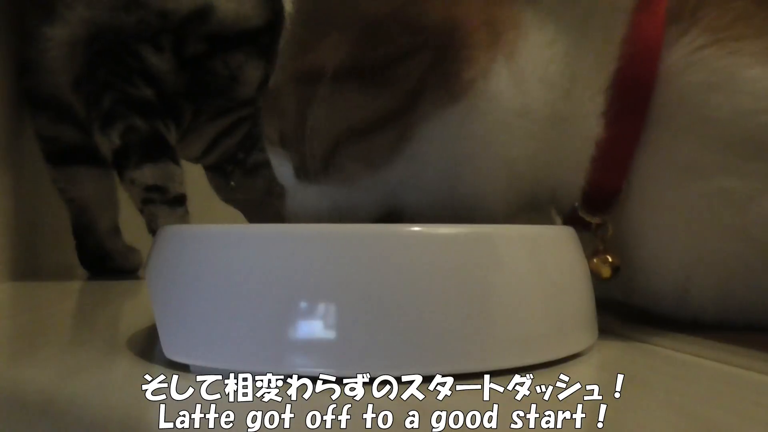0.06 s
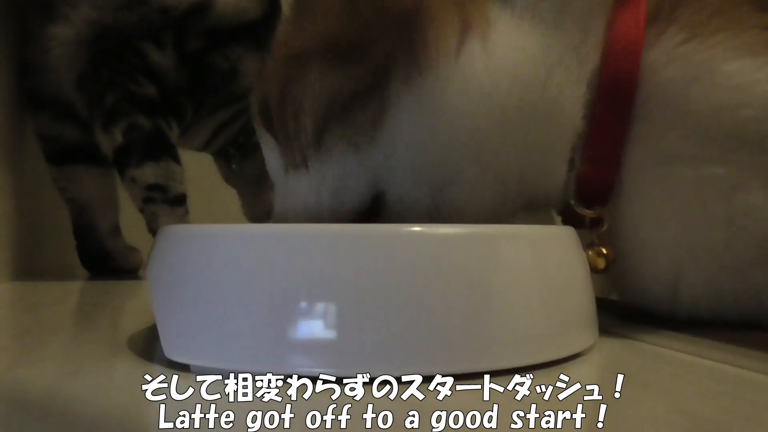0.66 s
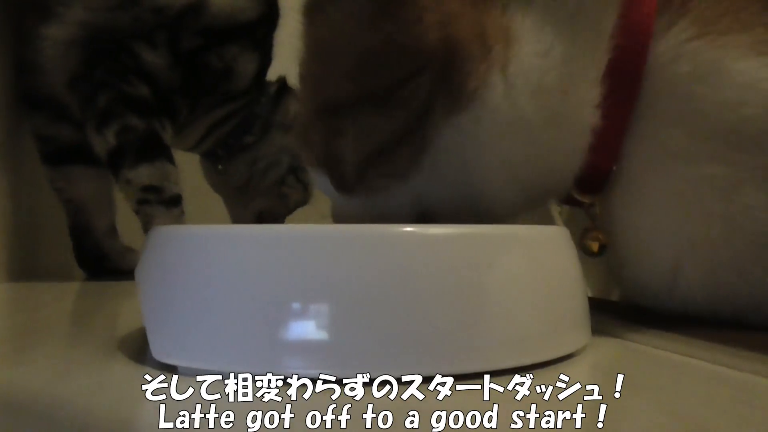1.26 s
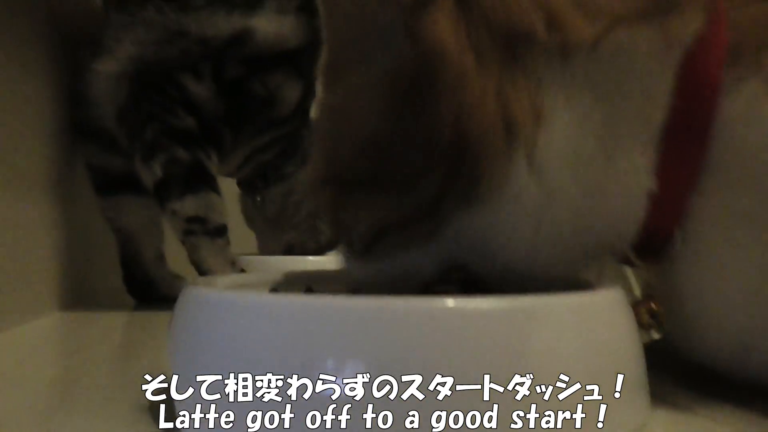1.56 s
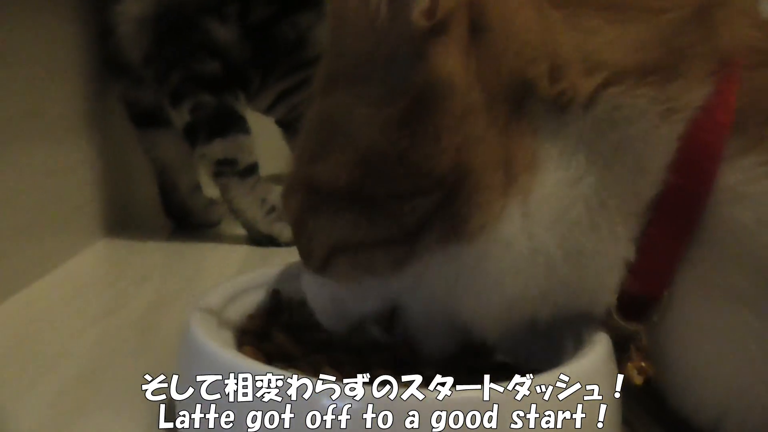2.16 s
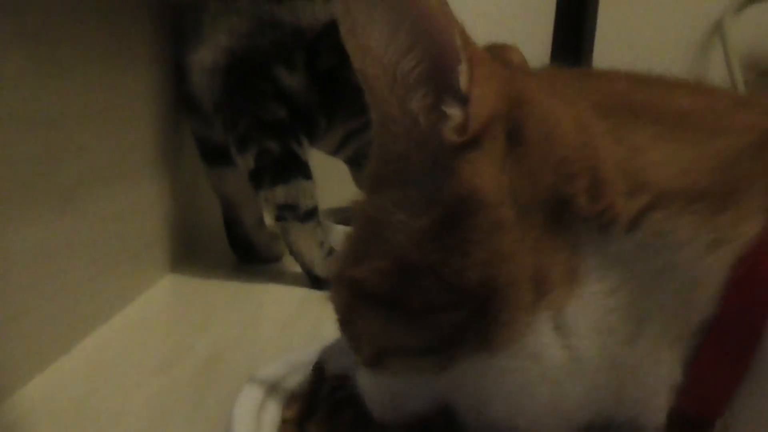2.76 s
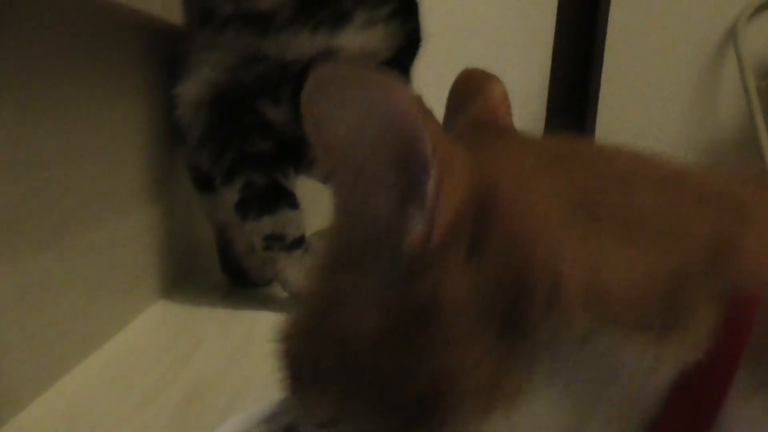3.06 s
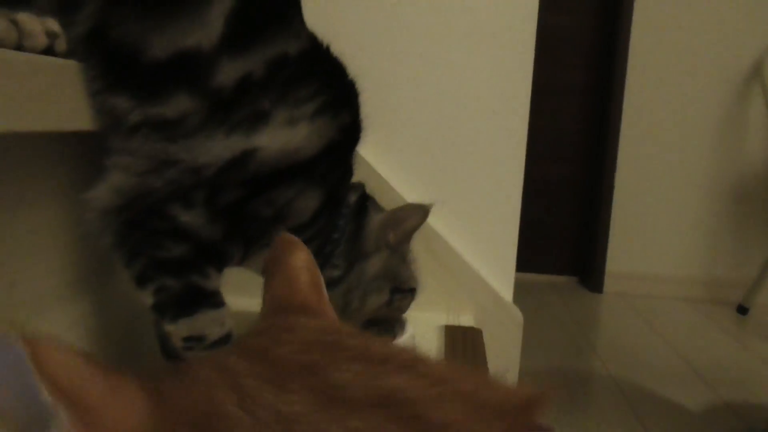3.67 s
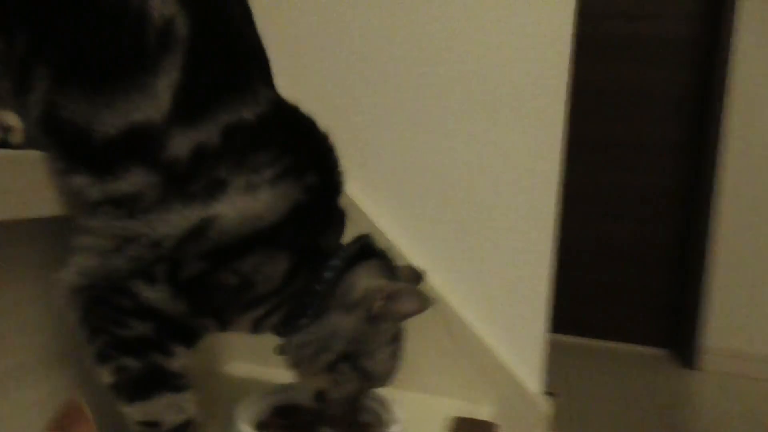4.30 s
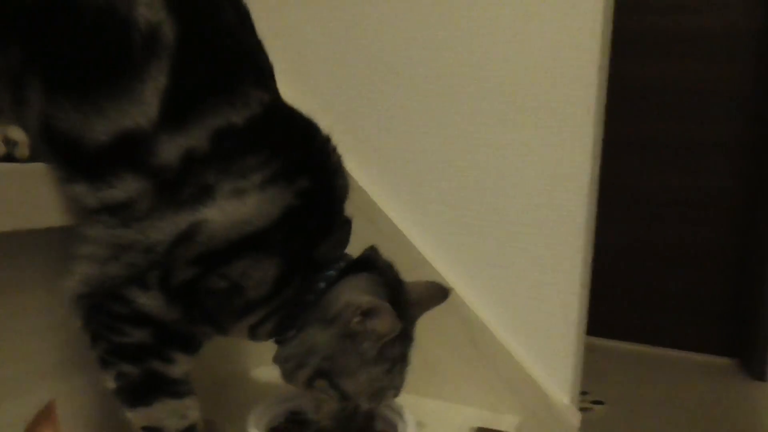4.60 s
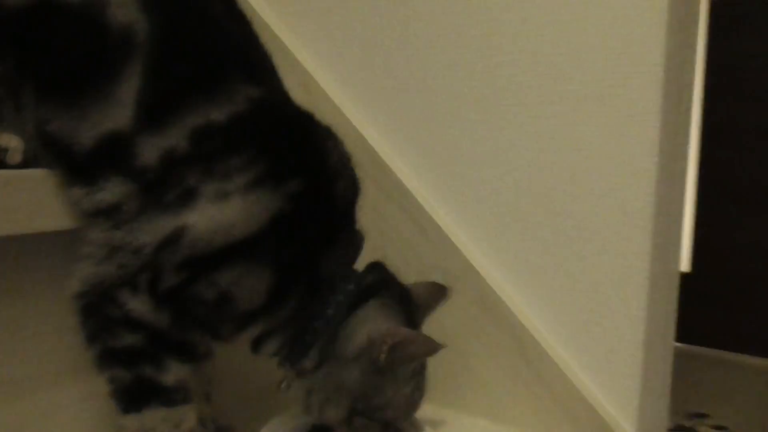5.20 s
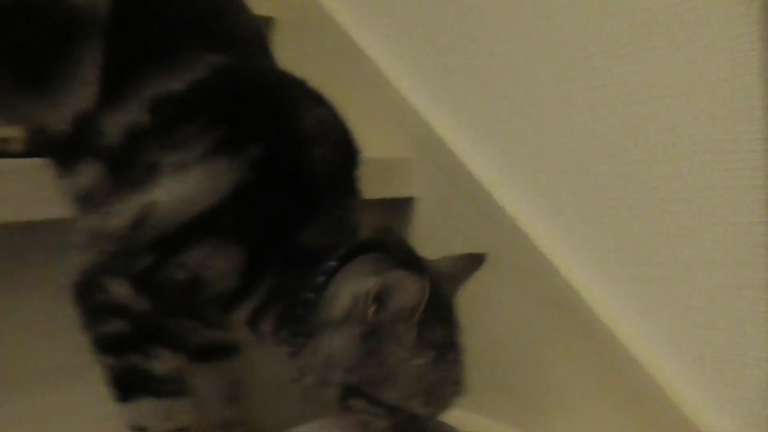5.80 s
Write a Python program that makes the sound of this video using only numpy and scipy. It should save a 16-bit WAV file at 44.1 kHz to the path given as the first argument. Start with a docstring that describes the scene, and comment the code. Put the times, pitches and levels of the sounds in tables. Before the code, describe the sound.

Close by, a cat pushes dry food around a ceramic bowl, making small, high clinks and rattles while it chews, smacks and cracks single pieces. Soft bumps and low rubs sound near the microphone early on. Past the middle, a second cat's bowl takes over, farther away and slightly left, and the clicks thin out. The indoor space is quiet, with a low, even hush and very little echo.

```python
"""Dry kibble rattles and clinks in ceramic bowls as two cats eat in a quiet stairwell, one close, one farther.
Muzzles stir the food in bouts, and each collision excites the resonant modes of a bowl.
In between, jaws chew and smack, ringing the cavity of the mouth, and teeth crack single pieces.
A few dull bumps, short low rubs and brushes of fur sound close by, over a steady hush."""
import sys
import numpy as np
from scipy import signal
from scipy.fft import rfft, irfft
from scipy.io import wavfile
from scipy.ndimage import uniform_filter1d, map_coordinates

SR = 44100
rng = np.random.default_rng(int(sys.argv[2]) if len(sys.argv) > 2 else 0)


def to_wav(s):
    """Save 16-bit WAV."""
    ch = np.atleast_2d(s).T  # columns
    pcm = np.round(np.clip(ch, -1, 1) * 32767)  # PCM
    wavfile.write(sys.argv[1], SR, pcm.astype(np.int16))


N = 266805


def from_db(db):
    """Amplitude ratio of a level in decibels."""
    return 10 ** (np.asarray(db) / 20)


def rms_one(x):
    """Normalisation to unit rms."""
    return x / np.sqrt(np.mean(x ** 2) + 1e-20)


def at_level(sound, db, size):
    """Normalisation of a transient by the rms of its first samples."""
    return sound * from_db(db) / np.sqrt(np.mean(sound[:, :size] ** 2))


def in_time(rows):
    """Linear interpolation of (time_s, value) rows at every sample."""
    return np.interp(np.arange(N) / SR, *np.transpose(rows))


def swells(rows):
    """Amplitude envelope: one elliptical arch for each (start_s, length_s, level_db)."""
    t = np.arange(N) / SR
    return sum(from_db(db) * np.sqrt(np.maximum(1 - (2 * (t - s) / length - 1) ** 2, 0))
               for s, length, db in rows)


def panned(x, left_db):
    """Level difference between channels: positive values move the sound left."""
    return np.array([x[0] * from_db(left_db / 2), x[1] * from_db(-left_db / 2)])


def two_mics(force, spread):
    """Partial decorrelation: each impulse reaches the two microphones with unequal strength."""
    return force * (1 + spread * rng.standard_normal(len(force)) * np.array([[1], [-1]]))


def add(out, sound, start_s):
    """Superposition of a sound onto the mix."""
    i = max(0, round(start_s * SR))
    out[:, i:i + sound.shape[1]] += sound[:, :N - i]


def rolloff(x, order, hz, kind="low"):
    """Maximally flat low-pass or high-pass filter."""
    return signal.sosfilt(signal.butter(order, hz, kind, fs=SR, output="sos"), x)


def resonance(x, hz, width_hz):
    """Damped oscillator: two poles, unit gain at the peak."""
    r = np.exp(-np.pi * width_hz / SR)
    feedback = [1, -2 * r * np.cos(2 * np.pi * hz / SR), r * r]
    return signal.lfilter(np.array([1, 0, -1]) * (1 - r * r) / 2, feedback, x + 1e-18)


def coloured(x, spectrum, size=4096):
    """Minimum-phase filter that follows (frequency_hz, gain_db) rows."""
    hz, db = np.transpose(spectrum)
    f = np.maximum(np.arange(size // 2 + 1) * SR / size, 1)
    below_db = 20 * np.log10(np.minimum(f / hz[0], 1))
    cepstrum = irfft(np.log(from_db(np.interp(np.log(f), np.log(hz), db) + below_db)))
    cepstrum[1:size // 2] *= 2   # folding the cepstrum makes the response causal
    cepstrum[size // 2 + 1:] = 0
    response = irfft(np.exp(rfft(cepstrum)))
    return signal.fftconvolve(x, response[None], axes=1)[:, :x.shape[1]]


def grains(per_s, size_db, spread, grain_s):
    """Shot noise: random collisions of uneven size, each decaying exponentially; unit rms."""
    onsets = rng.random(N) < per_s / SR
    power = onsets * from_db(size_db * np.minimum(rng.exponential(1, N), 3)) ** 2
    power = signal.lfilter([1], [1, -np.exp(-2 / (grain_s * SR))], power + 1e-12)
    power = power / (uniform_filter1d(power, size=1300) + .1 * power.mean())   # evens out slow swings
    return rms_one(two_mics(np.sqrt(power) * rng.standard_normal(N), spread))


def contact(chatter_s, spread, size=3000):
    """Impact force: a chatter of tiny rebounds that stops abruptly, then a faint slide."""
    t = np.arange(size) / SR
    envelope = np.exp(-(t / chatter_s) ** 3) + from_db(-25) * np.exp(-t / .006)
    attack = 1 - np.exp(-t / .0001)
    return two_mics(rng.standard_normal(size) * envelope * attack, spread)


# spectrum of the indoor hush: frequency_hz, gain_db
HUSH_SPECTRUM = [(25, -14), (45, -23), (100, -2.5), (160, -1), (330, -9.5), (620, -17.5), (1050, -10.5),
                 (1400, -9), (1800, -29), (4900, -30), (6200, -21), (10000, -22), (16000, -27)]

def room_tone():
    """Stationary noise, strongest in the bass, gives a steady hush."""
    noise = two_mics(rng.standard_normal(N), spread=.49)
    return from_db(-57) * rms_one(coloured(noise, HUSH_SPECTRUM))


def stairwell(x, t60_s, wet_db):
    """Reverberation: a diffuse exponential tail, different on each side, follows the direct sound."""
    t = np.arange(N // 14) / SR
    tail = rng.standard_normal((2, len(t))) * from_db(-60 * t / t60_s) * (t > .004)
    tail = tail / np.sqrt(np.sum(tail ** 2) / 2)
    return x + from_db(wet_db) * signal.fftconvolve(x, tail, axes=1)[:, :N]


# spectrum of brushing fur: frequency_hz, gain_db
FUR_SPECTRUM = [(1500, -1), (4000, 2.5), (6200, -3), (9000, -1), (15000, -7.5)]
# fur brushes past: start_s, length_s, level_db
FUR_STROKES = [(1.02, 0.07, -50.5), (1.175, 0.13, -42.5), (5.96, 0.11, -51)]

def brushing():
    """Friction noise: fur gives a smooth hiss that swells with each stroke."""
    noise = two_mics(rng.standard_normal(N), spread=.7)
    return rms_one(coloured(noise, FUR_SPECTRUM)) * swells(FUR_STROKES)


# something soft rubs close by: start_s, length_s, relative_level_db, pitch_hz, fall_octaves_per_s
SOFT_RUBS = [(0.044, 0.13, -46, 373.3, 0.35), (0.322, .16, -40.5, 440, 4), (0.479, .13, -43, 165.4, 5.53),
             (1.338, 0.24, -41, 266.5, 0.52), (2.599, .15, -43, 299.8, 0.44),
             (3.292, .17, -53.5, 305, 0.26)]

def rubbing(slip_hz=95, fade_db=4.5):
    """Amplitude modulation: uneven slips roughen a low tone that sinks and fades as the stroke slows."""
    out = np.zeros((2, N))
    for s, length, db, hz, fall in SOFT_RUBS:
        t = np.arange(0, length, 1 / SR)
        noise = two_mics(rng.standard_normal(N // 2), spread=.12)
        slips = rms_one(rolloff(noise, 2, slip_hz)[:, -len(t):])
        tone = np.sin(2 * np.pi * np.cumsum(hz * 2 ** (-fall * t)) / SR)
        envelope = from_db(db + 3 - fade_db * t / length) * signal.windows.tukey(len(t), .08)
        add(out, slips * tone * envelope, s)
    return rolloff(out, 4, 75, "high")


# soft blows: start_s, level_db, pitch_hz
DULL_BUMPS = [(0.048, -32.5, 367), (0.326, -35.5, 368), (0.412, -40, 236), (0.495, -42, 137),
              (0.9276, -34, 318), (1.338, -29.5, 160), (1.345, -31.5, 224), (1.367, -30, 357),
              (1.434, -33, 193), (1.525, -29, 383), (1.526, -33.5, 765), (2.595, -33, 282)]

def bumps():
    """Heavy damping: a soft blow dies within a few cycles and has little deep bass."""
    out, t = np.zeros((2, N)), np.arange(N // 40) / SR
    for s, db, hz in DULL_BUMPS:
        thud = np.sin(2 * np.pi * hz * t) * np.exp(-t * hz) * (1 - np.exp(-t / .00086))
        add(out, at_level(np.array([thud, thud]), db, size=530), s)
    return rolloff(out, 4, 85, "high")


# spectrum of mouth sounds: frequency_hz, gain_db
MOUTH_SPECTRUM = [(150, -11.5), (400, 0), (630, -13), (850, -5), (1050, -8), (1370, -5), (1680, -14),
                  (2050, -10.5), (3000, -15.5), (4800, -11.5), (8000, -45), (16000, -120)]
# strokes of jaw or tongue: peak_s, length_s, relative_level_db, resonance_hz
JAW_STROKES = [(0.229, 0.14, -47.5, 2140), (0.508, 0.12, -46, 1280), (0.652, 0.12, -45, 1780),
               (0.811, 0.067, -40.5, 1580), (0.909, 0.15, -42.5, 1260), (1.06, 0.15, -44, 1710),
               (1.284, 0.34, -47, 1410), (1.456, 0.24, -47.5, 1340), (1.598, 0.15, -44.5, 2000),
               (1.813, 0.27, -51.5, 1180), (1.991, 0.13, -42, 1880), (2.214, 0.29, -48.5, 1220),
               (2.439, 0.1, -46, 1610), (2.684, 0.48, -47, 1300), (2.943, 0.12, -46.5, 1550),
               (3.165, 0.1, -48, 1770), (3.288, 0.14, -48.5, 1190), (3.491, 0.1, -42.5, 1460),
               (3.75, 0.11, -44.5, 1350), (3.898, 0.11, -46, 1330), (4.125, 0.15, -43.5, 1330),
               (4.284, 0.18, -48, 1070), (4.544, 0.23, -50, 1210), (4.696, 0.15, -44.5, 1040),
               (4.858, 0.39, -49, 1220), (5.139, 0.15, -50, 1360), (5.365, 0.26, -49.5, 1350),
               (5.63, 0.31, -56.5, 1450)]
# direction of the chewing: time_s, left_over_right_db
CHEWING_PAN = [(3.3, -0.5), (4.2, 4), (5.4, 3), (5.9, 2)]

def chewing(edge_db=23):
    """Cavity resonance: the mouth filters wet crackle in strokes that fall edge_db below the peak halfway to
    their ends."""
    crackle = grains(per_s=300, size_db=3.5, spread=.3, grain_s=.004)
    crackle = rms_one(coloured(crackle, MOUTH_SPECTRUM))
    t = np.arange(N) / SR
    out = crackle * from_db(-50 - 1.7 * t)   # faint licking, slowly fading
    for s, length, db, hz in JAW_STROKES:
        span = np.abs(t - s) < length
        hollow = resonance(crackle[:, span], hz, width_hz=500) + from_db(-11) * crackle[:, span]
        swell_db = db - edge_db * (2 * (t[span] - s) / length) ** 2
        out[:, span] += rms_one(hollow) * from_db(swell_db)
    return panned(from_db(-2.5) * out, in_time(CHEWING_PAN))


# spectrum of a dry click of kibble or teeth: frequency_hz, gain_db
CLICK_SPECTRUM = [(200, -7), (700, -19.5), (1200, 9.5), (2100, -26.5), (3000, 5), (4200, -1.5), (7000, -8),
                  (10000, -4.5), (12000, -18), (14000, -17), (16500, -8)]
# lips and teeth snap shut: start_s, level_db, pitch_hz, left_over_right_db
JAW_SNAPS = [(0.047, -31, 1380, 3.5), (0.239, -37, 2280, -3), (0.672, -45, 1880, -1),
             (0.802, -43.5, 1200, 2), (0.854, -40, 3300, 0), (0.929, -32, 1010, 1.5), (1.067, -38, 3030, 0),
             (1.16, -43.5, 3560, -3), (1.3669, -22, 1220, 1), (1.402, -33, 900, 4),
             (1.467, -37.5, 1840, -1), (1.624, -37, 2280, 2), (3.058, -36.5, 1180, -2),
             (4.716, -43, 1000, 8), (5.549, -42.5, 1340, -1), (5.678, -44.5, 1280, 3), (5.977, -43, 785, 1)]

def smacks():
    """Impulse excitation: a snap of the jaw rings the mouth, with a sharp edge from the teeth."""
    out = np.zeros((2, N))
    for s, db, hz, left_db in JAW_SNAPS:
        force = contact(chatter_s=.0055, spread=.3)
        cavity = resonance(coloured(force, MOUTH_SPECTRUM), hz, width_hz=590)
        teeth = from_db(-22.5) * coloured(force, CLICK_SPECTRUM)
        add(out, panned(at_level(cavity + teeth, db, size=350), left_db), s)
    return out


# teeth break a piece: start_s, level_db
FRACTURES = [(0.047, -34.5), (0.1685, -39.5), (0.9287, -43.5), (1.366, -29.5), (1.6097, -34), (2.6883, -25),
             (2.9845, -32), (3.0164, -39), (3.034, -27), (3.33, -47), (3.631, -36), (5.5752, -40),
             (5.588, -44)]

def cracks():
    """Brittle fracture: a piece snaps between the teeth in a short, bright burst."""
    out = np.zeros((2, N))
    for s, db in FRACTURES:
        burst = resonance(contact(chatter_s=.0022, spread=.3), hz=11500, width_hz=4000)
        add(out, at_level(rolloff(burst, 6, 14000), db, size=220), s)
    return out


# modes of the filled bowls: frequency_hz, width_hz, near_bowl_db, far_bowl_db
BOWL_MODES = [(1350, 160, -19, -16), (2905, 75, -7, -7), (3490, 70, -7.5, -17), (4660, 190, -10, -11),
              (4880, 120, -11, 6), (5480, 100, -11, -16), (6110, 140, -18, -17), (6800, 220, -13, -16),
              (7150, 220, -7, -4), (7740, 160, -8, -8), (8090, 160, -11, -10), (9145, 110, -9, -11),
              (9780, 190, 2, -3), (10330, 170, -14, -6), (11000, 110, -10, -11), (11480, 170, -13, -12),
              (11900, 220, -13, -16)]

def bowl(force, far, click_db, wander_db):
    """Modal ringing plus the kibble's dry click; each mode's strength wanders with the spot struck."""
    t = np.arange(force.shape[1]) / SR
    spot_times = np.arange(0, t[-1] + .06, .03)
    ring = 0
    for hz, width, near_db, far_db in BOWL_MODES:
        spot_db = wander_db * np.interp(t, spot_times, rng.standard_normal(len(spot_times)))
        mode_db = near_db + far * (far_db - near_db) + spot_db
        ring = ring + from_db(mode_db) * resonance(force, hz, width)
    return ring + from_db(click_db) * coloured(force, CLICK_SPECTRUM)


# kibble is dragged along the glaze: start_s, length_s, level_db
GLAZE_DRAGS = [(0.335, 0.19, -40), (0.725, 0.063, -40)]

def scraping():
    """Stick-slip friction: dragged kibble catches so often that the near bowl keeps ringing."""
    slips = grains(per_s=260, size_db=3, spread=.3, grain_s=.003)
    force = resonance(slips, hz=3300, width_hz=1800) + from_db(-26) * slips
    return rms_one(bowl(force, far=0, click_db=-24, wander_db=3)) * swells(GLAZE_DRAGS)


# a muzzle pushes through the kibble: start_s, length_s, relative_level_db
MUZZLE_PUSHES = [(0.238, 0.045, -46.5), (0.344, 0.17, -36.5), (0.518, 0.046, -41.5), (0.624, 0.018, -48.5),
                 (0.731, 0.035, -43.5), (1.604, 0.026, -39), (1.686, 0.057, -48), (1.777, 0.14, -42.5),
                 (1.968, 0.031, -31.5), (2.098, 0.14, -39), (2.199, 0.029, -30.5), (2.241, 0.051, -41.5),
                 (2.416, 0.054, -40.5), (2.542, 0.16, -35.5), (2.787, 0.17, -45), (2.966, 0.023, -43.5),
                 (3.038, 0.033, -37), (3.101, 0.054, -43), (3.24, 0.036, -45), (3.284, 0.085, -43),
                 (3.47, 0.04, -45.5), (3.582, 0.042, -42.5), (3.68, 0.12, -43.5), (3.908, 0.011, -47),
                 (4.281, 0.057, -46.5), (4.468, 0.14, -43.5), (4.704, 0.034, -47), (4.82, 0.1, -49.5),
                 (4.872, 0.11, -45), (5.246, 0.17, -47), (5.558, 0.042, -50.5)]

def pushing(attack_s=.0098, sag_db_per_s=61, settle_db_per_s=405):
    """Incoherent sum: pushes add in power; each bites in, eases off, then the kibble settles."""
    power = np.zeros((1, N))
    t = np.arange(SR // 2) / SR - attack_s
    for s, length, db in MUZZLE_PUSHES:
        rise = np.clip(1 + t / attack_s, 0, 1)
        fall_db = sag_db_per_s * np.maximum(t, 0) + settle_db_per_s * np.maximum(t - length, 0)
        add(power, (rise * from_db(db - fall_db))[None] ** 2, s - attack_s)
    return np.sqrt(power[0])


# which bowl is heard most: time_s, far_fraction (0 near bowl, 1 far bowl)
BOWL_BLEND = [(0, 0.21), (2.7, 0.2), (3.3, 0.51), (4.0, 0.75)]
# resonances of large to small pieces: pitch_hz
PIECE_PITCHES = [2980, 5580, 7570, 9520]
PIECE_WIDTH_HZ = 3530

def stirring():
    """Random forcing: hundreds of collisions a second under a pushing muzzle keep the bowl ringing."""
    force = 0
    for hz in PIECE_PITCHES:
        hits = grains(per_s=130, size_db=3, spread=.46, grain_s=.002)
        force = force + resonance(hits, hz, PIECE_WIDTH_HZ) + from_db(-23.5) * hits
    rattle = bowl(force * pushing(), in_time(BOWL_BLEND), click_db=-14, wander_db=3.5)
    return from_db(12.5) * rattle


# single pieces hit the bowl: start_s, relative_level_db, pitch_hz, chatter_s
KIBBLE_HITS = [(0.0397, -27.5, 3600, 0.0047), (0.2116, -26, 4800, 0.0011), (0.2251, -27, 9400, 0.0012),
               (0.2391, -23, 5270, 0.0025), (0.39, -22.5, 9400, 0.0058), (0.441, -25, 9700, 0.0035),
               (0.448, -22.5, 7840, 0.0065), (0.462, -16, 9400, 0.0034), (0.4658, -16.5, 8000, 0.0087),
               (0.5366, -25, 7940, 0.0039), (0.678, -22, 9200, 0.002), (0.733, -26, 9500, 0.0071),
               (0.765, -27, 9300, 0.0019), (0.7961, -31.5, 9500, 0.0034), (1.174, -26.5, 8500, 0.001),
               (1.7005, -28, 8750, 0.0022), (1.7779, -19.5, 9000, 0.0046), (1.8105, -20, 8500, 0.0018),
               (1.823, -24, 9400, 0.0065), (1.9446, -25.5, 9800, 0.0022), (1.9704, -20, 9400, 0.0028),
               (1.993, -25, 7800, 0.0032), (2.0062, -22, 9700, 0.002), (2.08, -24, 5500, 0.0038),
               (2.1325, -16.5, 8500, 0.003), (2.4439, -17.5, 9600, 0.0076), (2.4613, -19, 9400, 0.014),
               (2.542, -28, 8800, 0.006), (2.5633, -21.5, 10200, 0.0093), (2.647, -25, 10800, 0.025),
               (2.6895, -15, 8100, 0.0034), (2.781, -31, 7700, 0.0026), (2.8554, -26.5, 7140, 0.011),
               (2.998, -22, 11100, 0.005), (3.037, -20.5, 8400, 0.0049), (3.142, -24, 6200, 0.0036),
               (3.1492, -24, 7100, .003), (3.2853, -14.5, 5900, 0.0024), (3.3297, -17, 9650, 0.0033),
               (3.4353, -38.5, 4850, .003), (3.5717, -30.5, 9700, 0.002), (3.5914, -23.5, 9150, 0.0018),
               (3.6071, -17.5, 9800, 0.0039), (3.6814, -27, 7340, 0.0025), (3.6874, -23, 7300, 0.0022),
               (3.6928, -23, 9700, 0.005), (3.93, -17, 5400, 0.0023), (4.017, -27.5, 8800, 0.0031),
               (4.281, -23.5, 8550, 0.0022), (4.467, -26, 8300, 0.011), (4.5275, -27.5, 5370, 0.0082),
               (4.9142, -32.5, 4890, 0.006), (5.2475, -33, 4470, 0.0033), (5.3033, -37.5, 4640, 0.026),
               (5.3782, -34, 4970, .012), (5.4774, -34, 9400, 0.0059), (5.4906, -40, 4940, 0.0061),
               (5.76, -46, 3420, 0.0039), (5.913, -38.5, 5540, 0.0017), (5.9422, -41.5, 3430, 0.00041)]

def clinks():
    """Selective excitation: the broad resonance of each piece picks out some of the bowl's modes."""
    out = np.zeros((2, N))
    for s, db, hz, chatter_s in KIBBLE_HITS:
        impact = contact(chatter_s, spread=.42)
        force = resonance(impact, hz, PIECE_WIDTH_HZ) + from_db(-10) * impact
        far = np.interp(s, *np.transpose(BOWL_BLEND))
        clink = bowl(force, far, click_db=-16, wander_db=3.5)
        add(out, at_level(clink, db - 6, size=220), s)
    return out


# direction of the kibble: time_s, left_over_right_db
KIBBLE_PAN = [(0.5, 1.5), (3.0, 0), (3.6, 1), (5.3, 3.5), (6.05, -2)]

def scene():
    """Superposition: the eating reverberates in the stairwell; rubs, fur and hush are added dry."""
    kibble = panned(clinks() + stirring() + scraping(), in_time(KIBBLE_PAN))
    eating = kibble + cracks() + chewing() + smacks() + bumps()
    return stairwell(eating, t60_s=.12, wet_db=-9.5) + rubbing() + brushing() + room_tone()


def record(dry):
    """Delay and band limiting: the right microphone hears slightly later, and both lose the very top."""
    lag_s, dull_hz, cutoff_hz = .000011, 15000, 17000
    right = map_coordinates(dry[1], [np.arange(N) - lag_s * SR], order=3, mode="nearest")
    dull = rolloff(np.array([dry[0], right]), 6, dull_hz)
    return signal.sosfilt(signal.cheby2(14, 70, cutoff_hz, fs=SR, output="sos"), dull)


dry = scene()
out = record(dry)
to_wav(out)
```